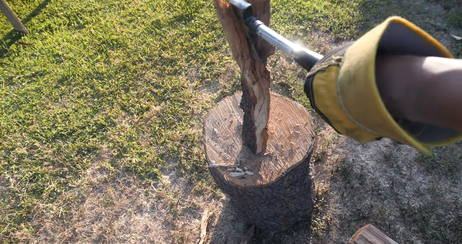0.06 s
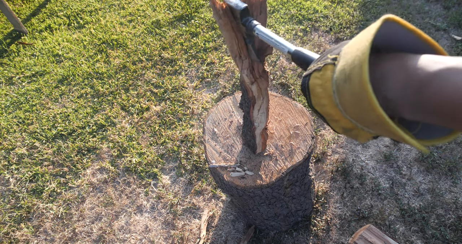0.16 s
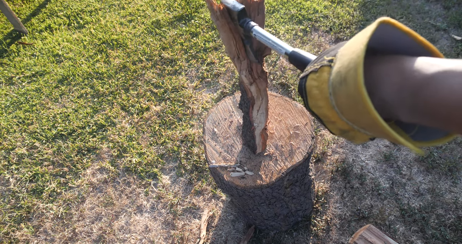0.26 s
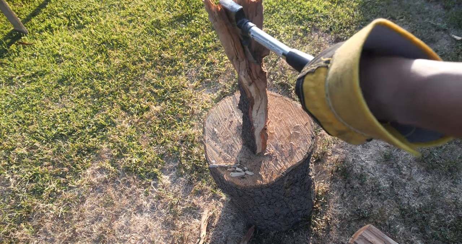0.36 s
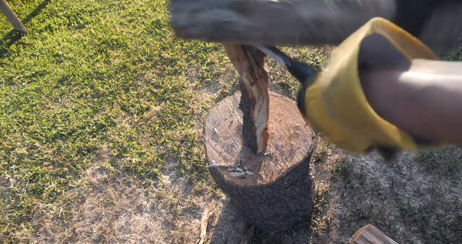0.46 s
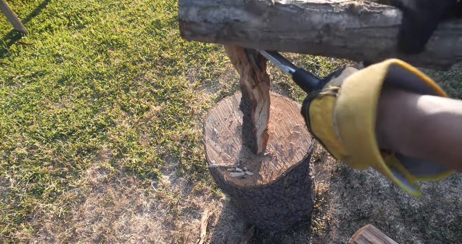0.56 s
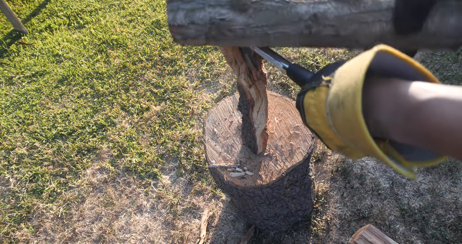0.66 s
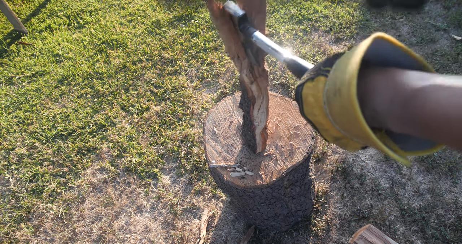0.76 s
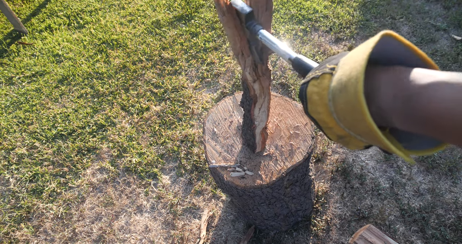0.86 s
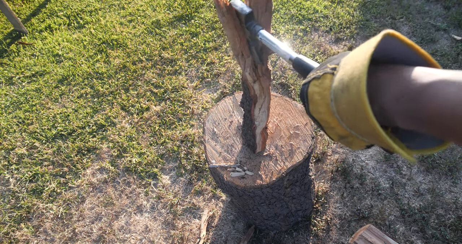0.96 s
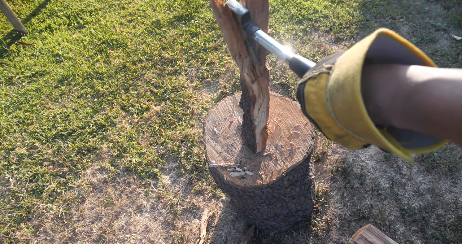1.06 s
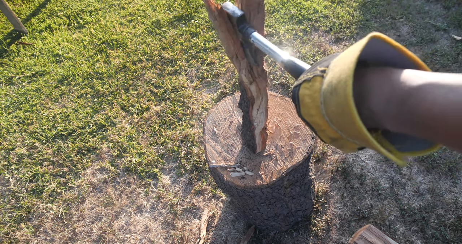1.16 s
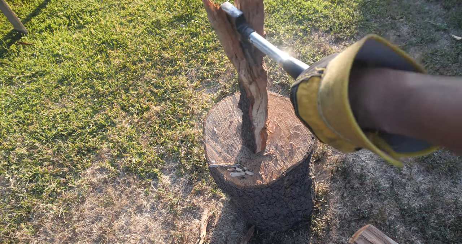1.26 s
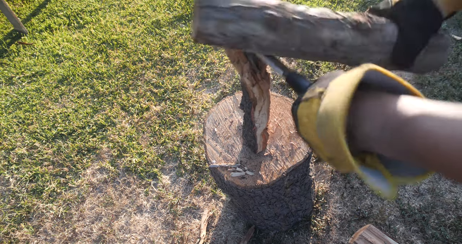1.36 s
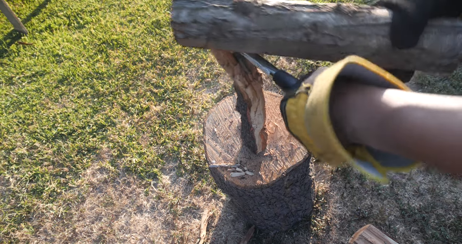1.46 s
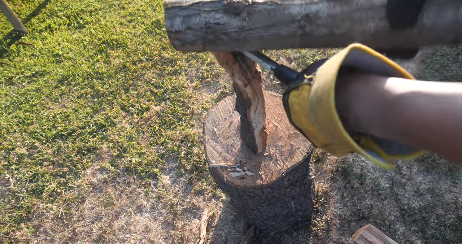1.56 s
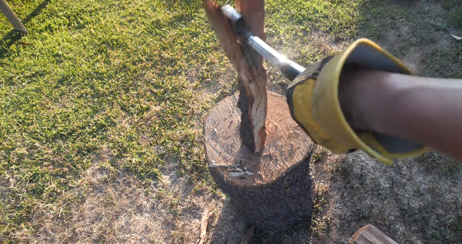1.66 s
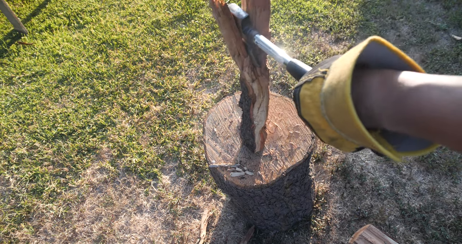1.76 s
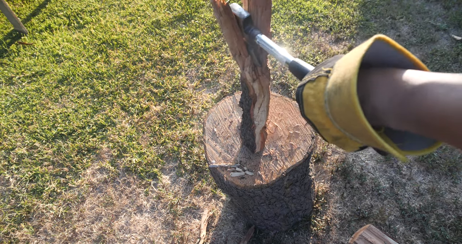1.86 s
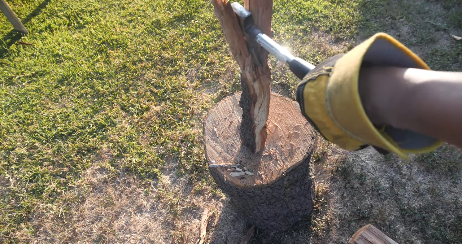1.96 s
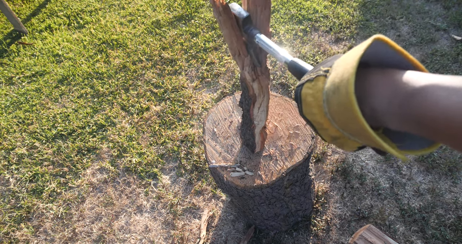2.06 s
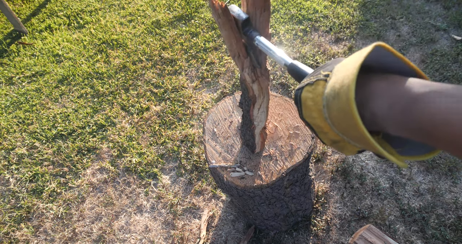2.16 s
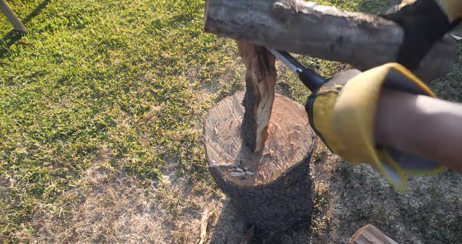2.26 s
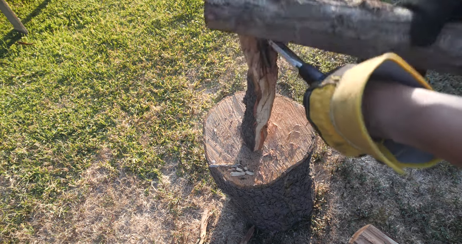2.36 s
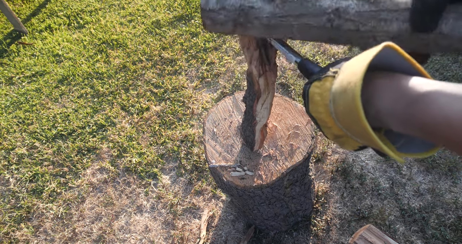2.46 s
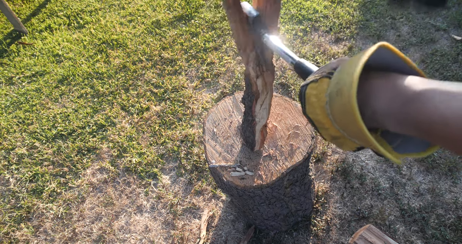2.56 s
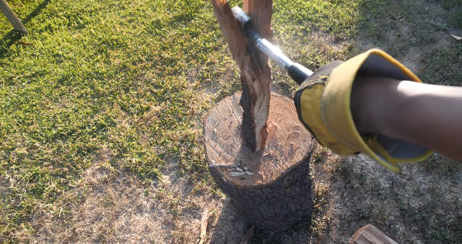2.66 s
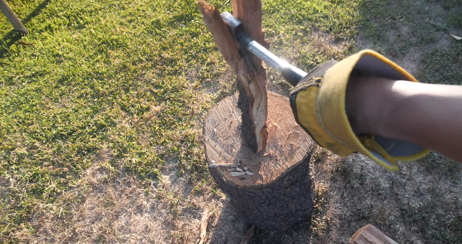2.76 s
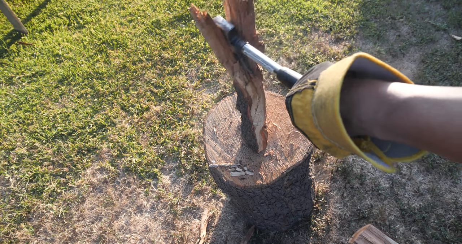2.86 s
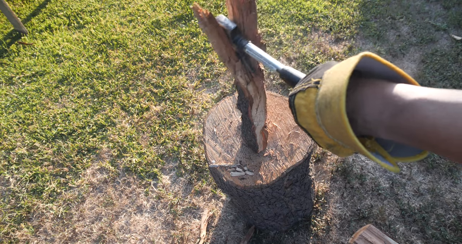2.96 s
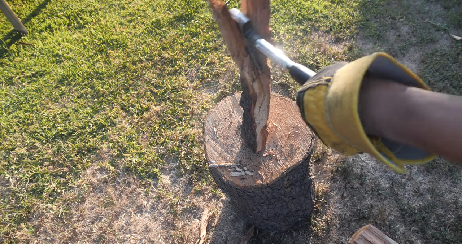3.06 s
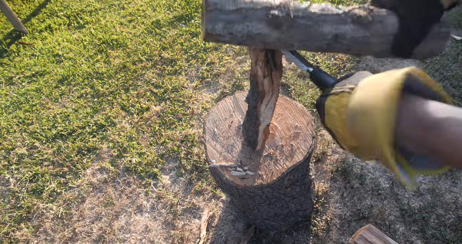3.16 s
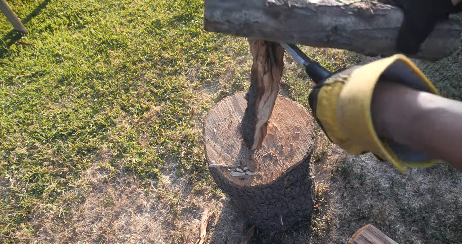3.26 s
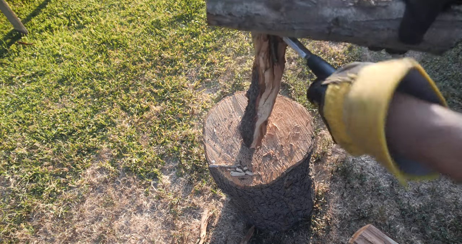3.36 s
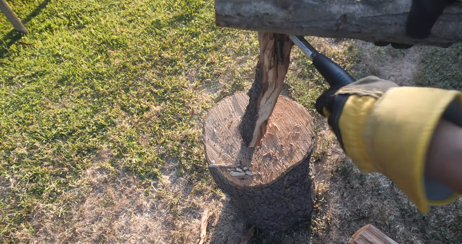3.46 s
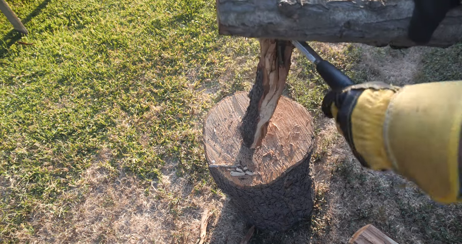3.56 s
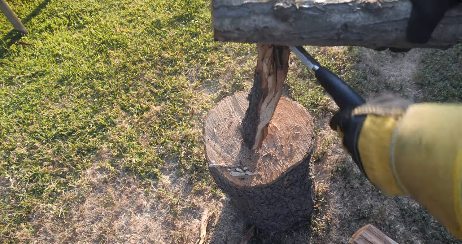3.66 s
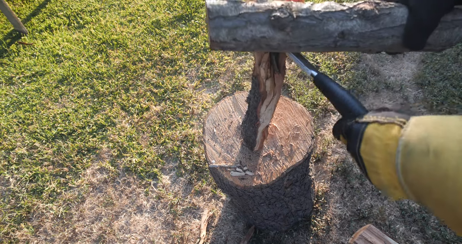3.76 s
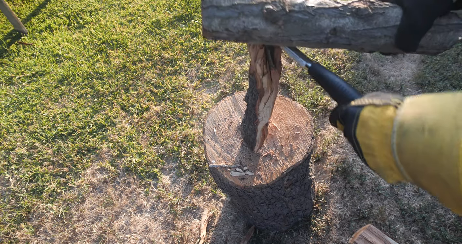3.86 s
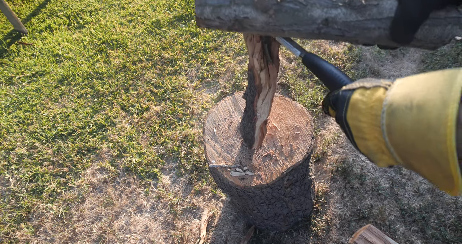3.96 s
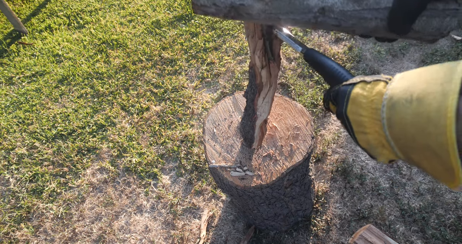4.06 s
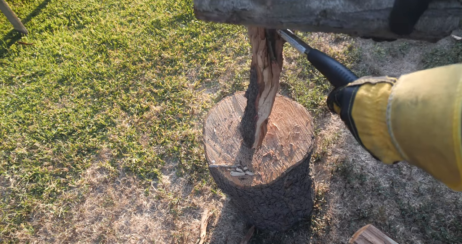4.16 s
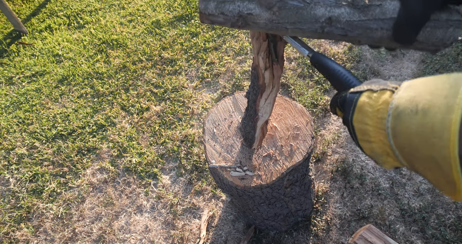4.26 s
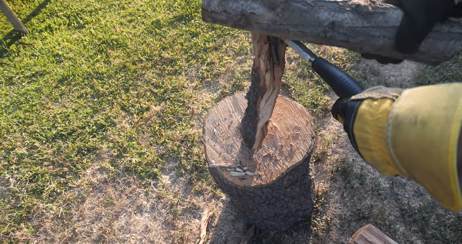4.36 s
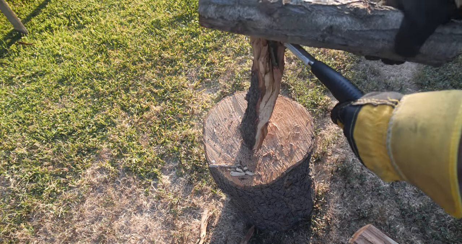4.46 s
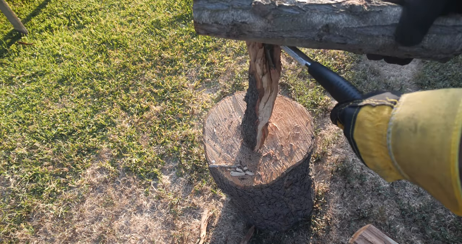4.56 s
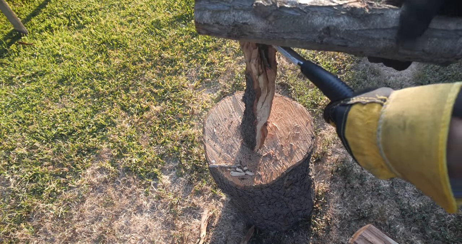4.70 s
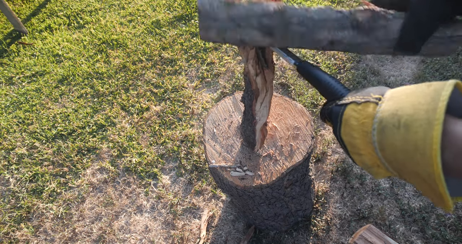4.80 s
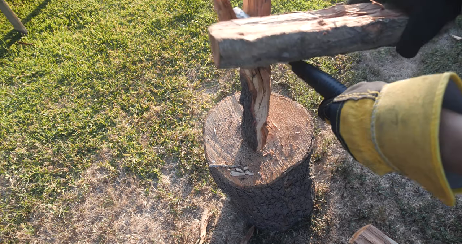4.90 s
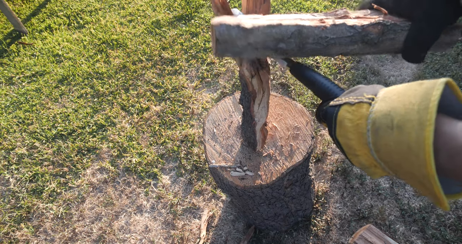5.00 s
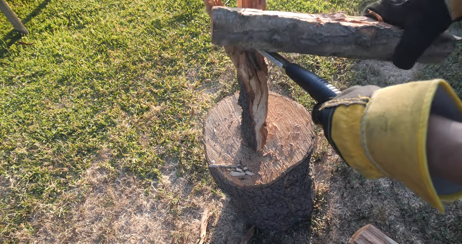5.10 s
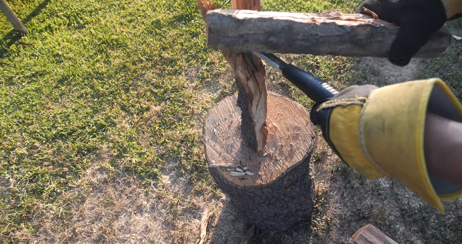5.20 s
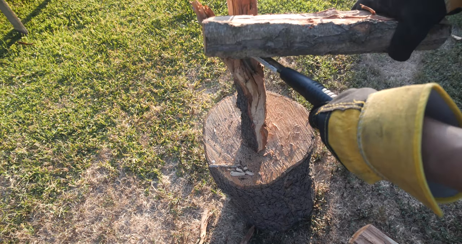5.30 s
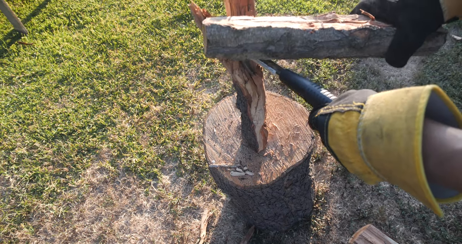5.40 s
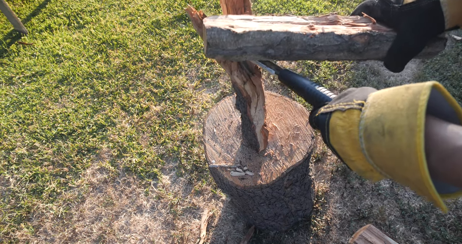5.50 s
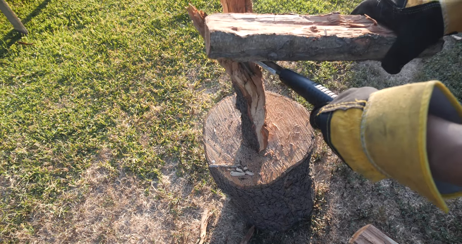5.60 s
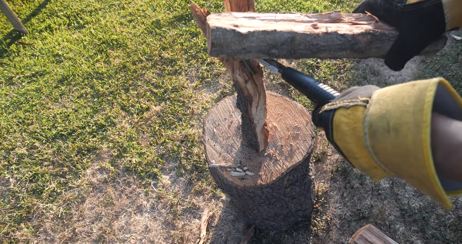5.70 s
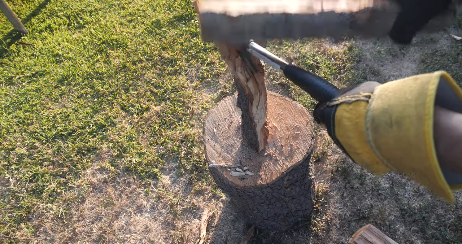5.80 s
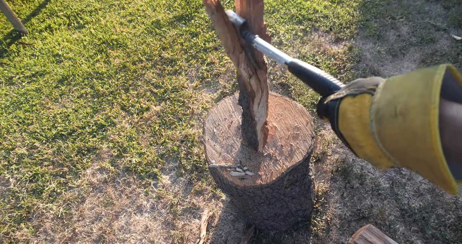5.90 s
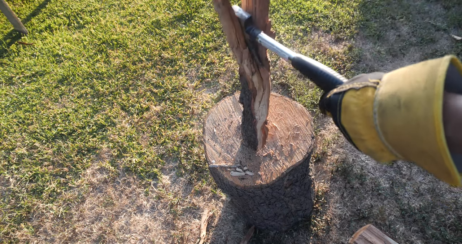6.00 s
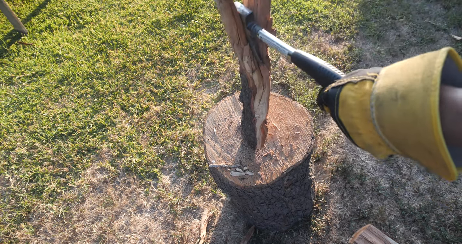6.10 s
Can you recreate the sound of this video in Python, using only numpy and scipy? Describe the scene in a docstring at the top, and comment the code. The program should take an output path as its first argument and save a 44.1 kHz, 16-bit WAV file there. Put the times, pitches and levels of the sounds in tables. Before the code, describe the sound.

A quiet backyard, heard close up, with low distant rumble, soft hiss and an uneven light breeze that is strongest at the start. Bark rubs faintly at 0.1 s and a fibre snaps at 0.4. At 0.5 s a log slams onto a hatchet: a loud, flattened crack of crushing wood with a short steely ring, splintery crackle and quick returns from fences, then a dull jolt on the stump. A light knock comes at 0.7. Equally hard blows land at 1.4, 2.3 and 3.2 s, the later ones led by a low push of air, the last ringing most and followed by a sharp fibre snap. From 3.5 s bark scrapes drily over wood and glove. Weak, scuffing knocks with faint ringing come at 4.3, 4.8, 5.0, 5.15, 5.4 and 5.8 s, among tiny ticks and soft rubbing as the breeze returns.

```python
"""In a quiet backyard, over a distant rumble and an uneven breeze, a hatchet stuck in firewood is driven by a log.
First a fibre snaps; then four blows fall, each a push of air, a noise burst of crushing wood and decaying modes of
wood, steel and yard, scattered by the yard and flattened by the overloaded microphone; the stick jolts on the stump.
One light knock falls among the blows. Then the log is set against the hatchet: more knocks of paired scuffs and
weak ringing. Fibres tick as short noise bursts, and bark rubs as strings of random grains, throughout the scene."""
import sys
import numpy as np
from scipy import signal
from scipy.fft import rfft, irfft
from scipy.io import wavfile

SR = 44100
rng = np.random.default_rng(int(sys.argv[2]) if len(sys.argv) > 2 else 0)


def unload_wav(signal):
    """Save mono or channel-first audio to the path in sys.argv[1] as 16-bit WAV at rate SR, clipped to [-1, 1]."""
    wavfile.write(
        sys.argv[1],
        SR,
        np.round(np.clip(np.atleast_2d(signal).T, -1, 1) * 32767).astype(np.int16),
    )


N = 270774
TIME = np.arange(N) / SR


def from_db(db):
    """Level to amplitude: 20 dB is a factor of ten."""
    return 10 ** (np.asarray(db) / 20)


def rms_one(x):
    """Normalisation to unit root-mean-square amplitude."""
    return x / np.sqrt(np.mean(x ** 2) + 1e-20)


def at_hz(points, hz):
    """Interpolation of a spectrum along a logarithmic frequency axis."""
    freq, value = np.transpose(points)
    return np.interp(np.log(np.maximum(hz, 1)), np.log(freq), value)


def level(curve):
    """Amplitude envelope, linear in decibels between the rows (time_s, level_db)."""
    return from_db(np.interp(TIME, *np.transpose(curve)))


def fade(t, t60):
    """Exponential damping: the amplitude is 60 dB down at t60 seconds."""
    return np.exp(-np.log(1000) * t / max(t60, 1e-4))


def colour(x, spectrum):
    """Linear filtering in the frequency domain, then unit rms."""
    gain = from_db(at_hz(spectrum, np.fft.rfftfreq(len(x), 1 / SR)))
    return rms_one(irfft(rfft(x) * gain, len(x)))


def noise(spectrum, size):
    """Gaussian noise shaped to a spectral density, of unit rms."""
    return colour(rng.standard_normal(size), spectrum)


def ragged(t, spread_db, step_s=0.0068):
    """Random modulation: the gain glides between a new random level every step_s."""
    knots = rng.standard_normal(1000)
    return from_db(spread_db * np.interp(t / step_s, np.arange(len(knots)), knots))


def ring(t, hz, db, t60):
    """Free vibration of one struck mode: a damped sinusoid."""
    return from_db(db) * np.sin(2 * np.pi * hz * t) * fade(t, t60)


def add(out, s, sound):
    """Superposition of a sound starting at s seconds."""
    start = max(round(s * SR), 0)
    out[start:start + len(sound)] += sound[:N - start]


def distant_air():
    """Stationary coloured noise: distant rumble and hiss."""
    # spectral density: frequency_hz, density_db (per Hz)
    air = [(20, -11), (45, -2), (90, 3), (135, 0.5), (185, -7), (240, -1.5), (310, -12), (450, -13.5),
           (530, -21), (1300, -24), (2200, -35), (3600, -28.5), (6000, -43.5), (11500, -44), (16000, -55.5)]
    return from_db(-58.5) * noise(air, N)


def breeze(breeze_db=3.5, gust_db=2.5, gust_s=0.19):
    """Turbulent pressure on the microphone: low noise under a slow and a random gust envelope."""
    # strength of the breeze, raised by breeze_db: time_s, level_db
    strength = [(0.0, -43.5), (0.27, -53), (1.28, -51), (1.71, -60), (2.48, -58.5), (2.87, -68.5),
                (3.3, -56.5), (3.63, -70.5), (5.63, -74), (5.97, -63.5), (6.14, -55.5)]
    # spectral density of the buffeting: frequency_hz, density_db (per Hz)
    buffet = [(12, -5), (22, -3.5), (38, -1), (70, -10.5), (130, -19), (300, -34.5), (700, -66.5)]
    gusts = level(strength) * ragged(TIME, gust_db, gust_s)
    return from_db(breeze_db) * gusts * noise(buffet, N)


def stroke(peak_s, length_s, db, rise_share=.55, edge_db=-13.5):
    """Rubbing envelope: the level swells to its peak, then falls; edge_db is both ends relative to the peak."""
    rise = np.clip(rise_share, .1, .9)   # share of the stroke spent swelling
    u = (TIME - peak_s) / length_s
    return from_db(db + edge_db * np.maximum(-u / rise, u / (1 - rise)))


def rubbing(grains_per_s=1400, spread_db=3.5):
    """Stick-slip friction: bark drags over wood and glove in many small random catches."""
    # strokes of bark and glove: peak_s, length_s, peak_db
    strokes = [(0.13, 0.094, -69.5), (1.693, 0.17, -74), (3.481, .24, -67.5), (3.695, 0.021, -59),
               (3.771, .22, -71), (4.633, 0.1, -69), (4.755, 0.12, -69), (4.971, 0.12, -71),
               (5.143, 0.48, -73)]
    # spectral density of the catches: frequency_hz, density_db (per Hz)
    bark = [(600, -2.5), (1400, 3.5), (2400, 0), (3800, 0.5), (6000, -8), (12000, -16.5), (16000, -21)]
    sizes = from_db(spread_db * np.minimum(rng.exponential(1, N), 3)) * rng.choice([-1, 1], N)
    grains = sizes * (rng.random(N) < grains_per_s / SR)
    pressure = sum(stroke(*row) for row in strokes)
    return pressure * colour(grains, bark)


def faint_snaps(snaps_per_s=3, mean_db=-63, spread_db=2, centre_hz=5000):
    """Poisson process of small snaps of strained wood, with pitches spread over an octave."""
    chance = rng.random((64, 3))
    times = np.cumsum(-np.log(1 - chance[:, 0])) / snaps_per_s   # exponential waiting times
    levels = mean_db + spread_db * (2 * chance[:, 1] - 1)
    pitches = centre_hz * 2 ** (chance[:, 2] - .5)
    return [row for row in zip(times, levels, pitches) if row[0] < TIME[-1]]


def snaps(snap_db=-6, t60_s=0.013):
    """Brittle fracture: each fibre gives way in a tiny noise burst round its own pitch."""
    # the louder fibres, levels before snap_db: start_s, level_db, pitch_hz
    loud_snaps = [(0.4298, -43.5, 1890), (1.57, -54, 5860), (1.9411, -55.5, 8800), (2.4101, -53.5, 8090),
                  (3.1199, -42, 3068), (3.142, -53.5, 7000), (3.2687, -32.5, 7910), (3.8274, -55, 6020),
                  (5.0202, -46.5, 2180)]
    out, t = np.zeros(N), TIME[:SR // 10]
    white = rng.standard_normal((80, len(t)))
    for (s, db, hz), grain in zip(loud_snaps + faint_snaps(), white):
        band = [(hz / 4, -28), (hz / 2, -13), (hz, 0), (hz * 2, -14), (hz * 5, -35)]
        burst = colour(grain, band) * fade(t, t60_s)
        add(out, s, from_db(db + snap_db) * burst)
    return out


def hatchet(t, low_db, high_db):
    """Bending modes of steel: each of two notes dies fast and leaves a faint close partner."""
    # modes of the lower and the higher note, before low_db and high_db: frequency_hz, level_db, t60_s
    low_modes = [(968.5, 3.5, .065), (965, -36, 0.24)]
    high_modes = [(1254.6, 7.5, .06), (1255, -18, 0.14)]
    low = sum(ring(t, *mode) for mode in low_modes)
    high = sum(ring(t, *mode) for mode in high_modes)
    return from_db(low_db) * low + from_db(high_db) * high


def wall_echoes(t, smear_t60=0.018):
    """Reflection: each wall returns a smeared echo round a favoured pitch."""
    # fence and walls: delay_s, level_db, favoured_hz
    walls = [(0.056, -31.5, 3000), (0.105, -42, 2322), (0.124, -50, 3500), (.172, -58.5, 2480)]
    # colour of an echo: multiple (of the favoured pitch), density_db
    echo_tint = [(.33, -14), (.85, -7), (1, 0), (1.18, -7), (2, -8), (5, -17)]
    response = np.zeros(len(t))
    for delay, db, hz in walls:
        tint = [(hz * multiple, tint_db) for multiple, tint_db in echo_tint]
        echo = noise(tint, len(t)) * fade(np.abs(t - delay), smear_t60)
        response += from_db(db) * echo / np.linalg.norm(echo)
    return response


def yard(sound, scatter_db=-28, far_db=-28, far_t60=1.0, ragged_db=3, build_t60=0.035):
    """Convolution with an impulse response: ragged scatter dying band by band, a far tail and wall echoes."""
    # spectral density of the scatter: frequency_hz, density_db (per Hz)
    scatter_spectrum = [(100, -2), (300, -4), (600, -13), (1100, -1), (1500, -1), (1950, -2.5), (2350, 3.5),
                        (2800, -1), (4000, 1), (8000, -6), (16000, -13.5)]
    # decay of the scatter: frequency_hz, t60_s
    decay_times = [(100, 0.18), (500, 0.63), (1200, 0.43), (3500, 0.14), (8000, 0.065), (16000, 0.16)]
    t = TIME[:SR * 3 // 4]
    response = np.zeros(len(t))
    edges = np.geomspace(70, 17000, 9)
    for low, high in zip(edges, edges[1:]):
        band_filter = signal.butter(2, [low, high], "band", fs=SR, output="sos")
        band = signal.sosfilt(band_filter, noise(scatter_spectrum, len(t)))
        near = fade(t, at_hz(decay_times, np.sqrt(low * high)))
        far = from_db(far_db) * (high < 2500) * fade(t, far_t60)   # only the lows return from far away
        response += band * (near + far)
    response *= ragged(t, ragged_db) * (1 - fade(t, build_t60))    # scatter needs a moment to come back
    response *= from_db(scatter_db) / np.linalg.norm(response)
    response += wall_echoes(t)
    return signal.fftconvolve(sound, response)


def knocks(scuff_db=-7, steel_db=-9):
    """Repeated light impact: the log lands, lifts and lands again, scuffing bark and weakly exciting the steel."""
    # touches of log on hatchet; second_db is relative to the first contact:
    # start_s, level_db, scuff_t60_s, ring_db, brightness_db_per_octave, gap_s, second_db
    touches = [(0.7221, -37, 0.019, -25.5, 3.5, .0035, 6.5), (4.272, -42.5, .045, -14.5, -4.5, .006, -0.5),
               (4.786, -48, .02, -14, -2.5, .003, -10), (4.965, -52, 0.041, -15, -5, .016, 5),
               (5.1453, -43, 0.053, -9.5, -3.5, .014, -4.5), (5.1945, -51, 0.027, -14, -4.5, .003, -3),
               (5.4372, -51, 0.03, -28.5, -3, .004, -3), (5.8303, -41.5, 0.032, -10.5, 0, 0.013, -8.5)]
    # scuff before the brightness tilt: frequency_hz, density_db (per Hz)
    scuff_spectrum = [(200, -7.5), (700, -9.5), (1300, -9.5), (1650, -1), (2100, -6.5), (4000, -5.5),
                      (7000, -17.5), (12000, -19.5), (16000, -38)]
    out, t = np.zeros(N), TIME[:SR // 5]
    for s, db, t60, ring_db, brightness, gap, second_db in touches:
        tilted = [(hz, band_db + brightness * np.log2(hz)) for hz, band_db in scuff_spectrum]
        for delay, contact_db in ((0, 0), (gap, second_db)):
            scuff = from_db(scuff_db) * noise(tilted, len(t)) * fade(t, t60)
            steel = from_db(steel_db) * hatchet(t, ring_db, ring_db)
            add(out, s + delay, from_db(db + contact_db) * (scuff + steel))
    return out


def thumps(thud_hz=240, thud_db=5, thud_t60=0.0091, stump_hz=120, stump_db=-9, stump_t60=0.015, soft_hz=900):
    """Heavily damped low modes: the stick jolts on the stump, softened by a low-pass filter."""
    # dull jolts, levels relative: start_s, level_db
    jolts = [(0.603, -32), (1.4589, -24), (1.48, -32.5), (2.3548, -28.5), (3.2439, -23.5), (4.2129, -38),
             (4.2722, -42)]
    out, t = np.zeros(N), TIME[:SR // 8]
    thud = ring(t, thud_hz, thud_db, thud_t60) + ring(t, stump_hz, stump_db, stump_t60)
    for s, db in jolts:
        add(out, s, from_db(db) * thud)
    return signal.sosfilt(signal.butter(1, soft_hz, fs=SR, output="sos"), out)


def air_push(width_s=0.0097):
    """Displacement of air: the swinging log shoves one slow pressure wave, which peaks 50 ms in."""
    u = (TIME[:SR // 10] - 1 / 20) / width_s
    return (1 - u ** 2) * np.exp(-u ** 2 / 2)


def crushed_wood(t, crush_db=-1, crush_t60=0.03, crush_rise_s=0.0049,
                 splinter_db=-26, splinter_t60=.19, clump_db=3, grains_per_s=9000):
    """Fracture noise: a burst that rises in milliseconds, and a longer crackle of random splinters."""
    # spectral densities of crushing and splinters: frequency_hz, density_db (per Hz)
    crush_spectrum = [(60, -7), (150, 3.5), (400, 0), (800, 4.5), (1500, 0.5), (2100, -6), (3600, -2),
                      (5500, -13.5), (9000, -13), (16000, -26)]
    splinter_spectrum = [(300, 0), (1400, 4.5), (2200, -0.5), (3800, 3.5), (6000, -6.5), (10000, -18),
                         (16000, -19)]
    crush_envelope = fade(t, crush_t60) * (1 - fade(t, crush_rise_s))
    crush = from_db(crush_db) * noise(crush_spectrum, len(t)) * crush_envelope
    grains = rng.standard_normal(len(t)) * (rng.random(len(t)) < grains_per_s / SR)
    grains = grains * ragged(t, clump_db)
    splinters = from_db(splinter_db) * colour(grains, splinter_spectrum) * fade(t, splinter_t60)
    return crush + splinters


def struck_modes(t):
    """Modal superposition: damped modes with alternating sign and randomly spread level."""
    # modes of hatchet, log and stick, and one faint long 2.3 kHz resonance of the yard;
    # levels before the random spread: frequency_hz, level_db, t60_s
    mode_rows = [(151.5, -11, 0.046), (300, -6, .024), (482, -10, 0.02), (701, -7.5, 0.021),
                 (786, -0.5, .028), (914, -2, 0.015), (1011, -3.5, 0.049), (1407, -10, 0.048),
                 (1840, -19, 0.015), (2320, -47, 0.25), (3180, -14.5, 0.03), (3847, -16, 0.031),
                 (5100, -18.5, 0.02)]
    out = np.zeros(len(t))
    for k, (hz, db, t60) in enumerate(mode_rows):
        out += (-1) ** k * ring(t, hz, db + rng.normal(0, 1), t60)
    return out


def blow(crack_db, low_db, high_db, clang_db, yard_db, swell_s=0.068, carry_db=-8,
         low_carry_db=-5, fence_delay_s=.049, fence_db=-24):
    """Impact: wood crushes while struck modes vibrate freely; crack and steel radiate into the yard."""
    # higher steel mode, excited only at some points of contact: frequency_hz, level_db (before clang_db), t60_s
    clang_mode = (2805, 0, 0.032)
    t = TIME[:SR // 2]
    crack = from_db(crack_db) * crushed_wood(t)
    modes = struck_modes(t)
    swell = 1 - fade(t, swell_s)    # the ring swells as the log lets go
    steel = hatchet(t, low_db, high_db) * swell
    # the low note radiates into the yard less well than the high one
    radiated = hatchet(t, low_db + low_carry_db, high_db) * swell
    clang = from_db(clang_db) * ring(t, *clang_mode)
    out = from_db(yard_db) * yard(crack + from_db(carry_db) * radiated)
    add(out, 0, crack + modes + steel + clang)
    # the nearest fence returns the ring of the steel
    add(out, fence_delay_s, from_db(fence_db) * (radiated + clang))
    return out


def blows(push_lead_s=.075):
    """Sequence of impacts: each swing sends a push of air ahead of its blow."""
    # log on hatchet, levels relative within each part:
    # start_s, crack_db, low_ring_db, high_ring_db, clang_db, air_push_db, yard_db
    swings = [(0.5308, -0.5, -2, -2, -3, -57, -4), (1.3771, 1.5, -3, -4.5, -20.5, -38.5, -4),
              (2.285, -0.5, -8, 1, -5, -30.5, -1.5), (3.1815, 1.5, 5.5, 1, -15, -29, 0)]
    out = np.zeros(N)
    for s, crack_db, low_db, high_db, clang_db, push_db, yard_db in swings:
        add(out, s - push_lead_s, from_db(push_db) * air_push())
        add(out, s, blow(crack_db, low_db, high_db, clang_db, yard_db))
    return out


def scene():
    """Superposition of blows and handling on the outdoor background."""
    background = distant_air() + breeze()
    handling = knocks() + snaps()
    handling = handling + from_db(5.0) * yard(handling)[:N]
    return (blows() + thumps() + handling + rubbing() + background)[None]


def record(dry, top=.32, cutoff_hz=16300):
    """Saturation: the overloaded microphone flattens peaks near top; a low-pass cuts the highest treble."""
    clipped = dry / (1 + (dry / top) ** 8) ** (1 / 8)
    return signal.sosfilt(signal.ellip(10, .1, 80, cutoff_hz, fs=SR, output="sos"), clipped)


dry = scene()
out = record(dry)
unload_wav(out)
```